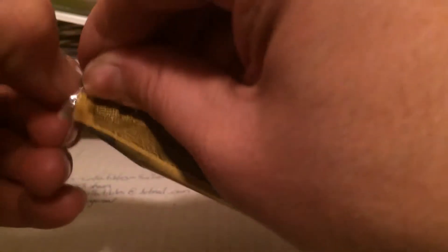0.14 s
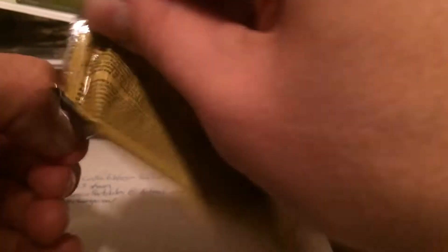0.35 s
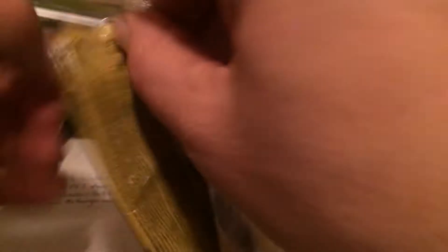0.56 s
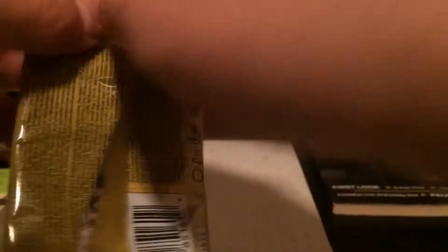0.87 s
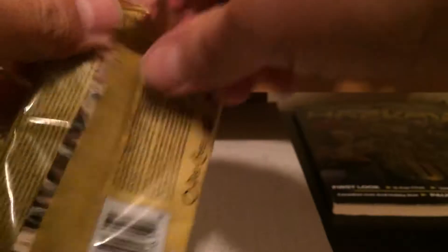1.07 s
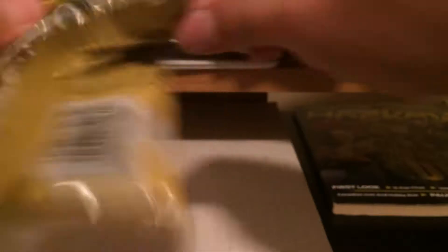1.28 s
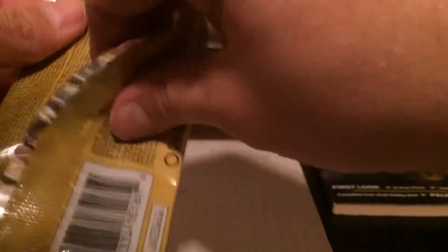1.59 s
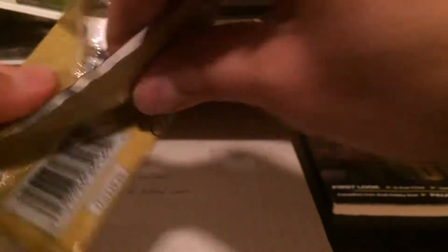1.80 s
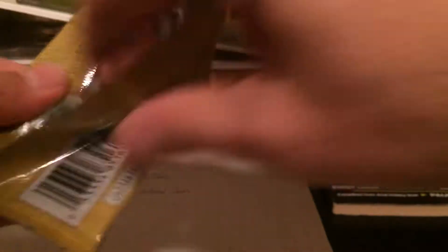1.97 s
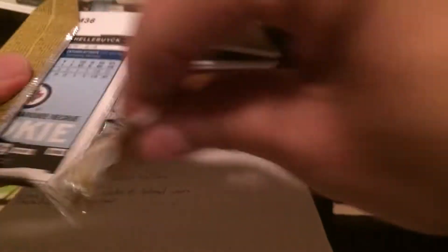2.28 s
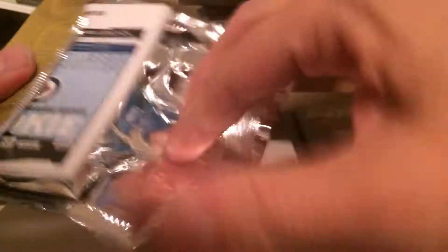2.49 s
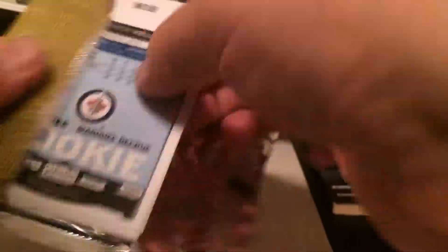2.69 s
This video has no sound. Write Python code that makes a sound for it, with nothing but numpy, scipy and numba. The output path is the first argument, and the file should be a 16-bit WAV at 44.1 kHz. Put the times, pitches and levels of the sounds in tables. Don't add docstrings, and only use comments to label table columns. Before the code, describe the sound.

Thin shiny foil packet picked at, crumpled and ripped open by hand, with bright snapping crackles

```python
import sys
import numpy as np
from scipy import signal
from scipy.fft import rfft, irfft
from scipy.io import wavfile
from numba import njit

SR = 44100
rng = np.random.default_rng(int(sys.argv[2]) if len(sys.argv) > 2 else 0)


def linear_from_db(decibels):
    return 10 ** (np.asarray(decibels, float) / 20)


def transcribe(u):
    v = np.clip(np.atleast_2d(u).T, -1, 1)
    q = np.round(v * 32767).astype(np.int16)
    wavfile.write(sys.argv[1], SR, q)


N = 125685

# (frequency [Hz], level [dB per Hz])
ROOM_COLOUR = [(18, -30), (30, -8), (75, -3), (131, -15), (780, -32.5), (4420, -47), (10200, -41),
               (16000, -41)]
# (time [s], level [dB], pitch [Hz], ring [s])
DESK_KNOCKS = [(0.519, -35, 220, 0.07), (0.59, -36.5, 206, 0.078), (0.646, -31, 195, 0.036),
               (0.683, -30.5, 199, 0.035), (0.71, -32.5, 129, 0.032), (0.753, -39.5, 58, 0.087),
               (1.147, -35, 143, 0.085), (1.384, -29.5, 72, 0.017), (2.043, -38, 123, 0.033),
               (2.52, -32, 199, 0.026), (2.541, -33.5, 101.4, 0.027), (2.618, -23, 247, 0.0069),
               (2.648, -39, 121, 0.036), (2.723, -24.5, 171, 0.005)]
POP_TIMES = [.3446, .3541, .409, 1.3157, 1.8634, 2.2578]
# (level [dB], leak time [s])
AIR_POPS = [
    (-14, 0.00099),
    (-6.5, 0.0048),
    (-11, 0.00069),
    (-9, 0.0014),
    (-2, 0.0018),
    (-5.5, 0.00027),
]
# (time [s], peak level [dB], pitch [Hz])
FACE_BUCKLES = [(.498, -31, 1150), (0.533, -31.5, 497), (0.591, -28, 670), (.62, -30, 560),
                (0.8, -30.5, 845), (.921, -21, 1570), (.952, -25, 1480), (1.059, -31, 1630),
                (1.37, -22, 620), (1.519, -28, 1230), (1.548, -26, 900), (1.826, -27, 445),
                (2.178, -31, 595), (2.376, -24.5, 380), (2.397, -23.5, 780), (2.442, -38, 315),
                (2.601, -23.5, 880), (2.837, -20.5, 750)]
# (time [s], foil level [dB], card stack level [dB])
FINGER_PRESSURE = [(0, -65, -71), (.18, -65.5, -65), (.24, -38, -41), (.33, -51, -50.5), (.44, -27.5, -39),
                   (.485, -41, -47.5), (.55, -34.5, -39), (.7, -37, -42), (1.0, -33, -47.5),
                   (1.2, -23.5, -62), (1.53, -26.5, -41), (1.6, -37, -48.5), (1.668, -30, -48),
                   (1.73, -38.5, -48), (2.11, -34, -51), (2.42, -35.5, -37.5), (2.648, -29.5, -36.5),
                   (2.72, -40.5, -45.5)]
# (frequency [Hz], level [dB per Hz])
FOIL_COLOUR = [(150, -52), (250, -50), (1380, -13.5), (1550, -18.5), (2760, -9), (3120, -2), (5930, -11.5),
               (11900, 11), (16000, -8.5)]
# (start [s], length [s], level [dB], brightness [dB per octave])
TEAR_JERKS = [(0.229, 0.0062, -21, -2.5), (0.358, 0.048, -8, -1), (0.746, 0.039, -24.5, -2),
              (0.81, 0.024, -25.5, 6), (0.833, 0.14, -25, -5.5), (0.976, 0.0046, -11.5, -5.5),
              (1.164, 0.034, -18.5, 1.5), (1.208, 0.068, -16, 2), (1.315, .005, -11.5, -2.5),
              (1.335, 0.049, -10, -3), (1.42, 0.048, -25.5, -4), (1.465, 0.085, -23, -2),
              (1.54, 0.0056, -16, -1), (1.634, 0.014, -13.5, -5), (1.748, 0.025, -24.5, -6.5),
              (1.792, 0.072, -19.5, 0), (1.869, 0.041, -10.5, -3), (1.916, 0.017, -23.5, -14),
              (2.044, 0.014, -17, -4), (2.153, 0.08, -26, -4), (2.234, .003, -11, -2.5),
              (2.252, 0.068, -8, -2), (2.321, 0.079, -20, -7.5), (2.506, 0.14, -27.5, -10.5),
              (2.826, .03, -24.5, -6.5)]
# (time [s], peak level [dB], patch pitch [Hz])
SINGLE_CREASES = [(0.0816, -19, 4440), (0.1282, -39, 11100), (0.1917, -40, 10500), (0.2019, -30, 8700),
                  (0.208, -29, 10400), (0.2205, -18.5, 12250), (0.2345, -21, 5460), (0.2477, -7.5, 9700),
                  (0.2605, -19, 6000), (0.2856, -18.5, 10700), (0.344, -7, 8650), (0.354, -10.5, 3520),
                  (0.3615, -13, 8100), (0.39, -11, 6500), (0.4088, -6, 5060), (0.42, -3.5, 6600),
                  (0.4299, -11, 9200), (0.463, -11, 9600), (0.4989, -28, 2310), (0.5186, -11.5, 8300),
                  (0.534, -17, 6100), (0.5453, -24, 5500), (0.5596, -16, 5400), (0.592, -15.5, 3400),
                  (0.621, -15, 5500), (0.6391, -6, 7200), (0.6633, -14, 7800), (0.6772, -9.5, 9100),
                  (0.7048, -17, 7800), (0.723, -13.5, 9250), (0.735, -12, 11800), (0.7422, -21, 4230),
                  (0.7468, -12, 6100), (0.7519, -11.5, 9350), (0.768, -20, 5100), (0.7798, -10, 8000),
                  (0.8103, -7.5, 7200), (0.8664, 1, 10800), (0.91, -16, 6670), (0.9212, -7.5, 6660),
                  (0.982, -8, 5230),
                  (1.0106, -8, 7100), (1.0303, -13, 7100), (1.0593, -14, 4350), (1.0919, -15, 10600),
                (1.1056, -15, 9000), (1.1148, -15, 7640), (1.1393, -10, 7300), (1.1521, -16, 6800),
                (1.1704, -13, 7400), (1.1822, 3.5, 5860), (1.1871, -8, 7500), (1.1968, -3, 6860),
                (1.2017, -2.5, 6600), (1.2124, 1.5, 7400), (1.2203, -7, 6500), (1.2428, -13, 6340),
                (1.2488, -7, 6750), (1.2724, -6.5, 5770), (1.3155, -6.5, 4600), (1.3212, -2, 7600),
                (1.3317, -1.5, 5160), (1.355, -2, 5360), (1.3627, -3.5, 5000), (1.3722, -4.5, 6100),
                (1.3916, -2, 7200), (1.3968, -8, 6500), (1.4196, -7.5, 8160), (1.4351, -3.5, 7350),
                (1.4444, -17, 7800), (1.4509, -10, 5700), (1.4894, -4, 6100), (1.5478, -6, 7300),
                (1.6266, -14, 7100), (1.6376, -2, 6000), (1.6562, -10, 6100), (1.6623, -24, 3400),
                (1.6732, -19, 6500), (1.6833, -16.5, 3970), (1.713, -17, 6170), (1.7524, -15, 5300),
                (1.7693, -14, 4970), (1.7978, -15, 5700), (1.8165, 0.5, 8100), (1.8238, -11, 5160),
                (1.8312, -4.5, 8300), (1.8407, -0.5, 7200), (1.8636, -4, 4000), (1.8751, -5, 7700),
                (1.9229, -5.5, 7160), (1.9321, -14, 4560), (1.9367, -17, 2880), (1.9447, -4, 7800),
                  (1.975, -13.5, 7200), (2.0137, -18, 9000), (2.0307, -10, 6200), (2.0521, -10, 5100),
                (2.0873, -23.5, 5400), (2.133, -19.5, 6400), (2.166, -9, 4750), (2.1767, -1.5, 5900),
                (2.1872, -14, 6600), (2.2372, 4.5, 7900), (2.2515, -9, 8300), (2.257, -11, 5240),
                (2.2975, -2, 6300), (2.314, -1, 4940), (2.3207, -5, 6800), (2.3369, 2, 6160),
                (2.3623, -4, 7200), (2.3672, -11, 8600), (2.3747, -17, 8600), (2.3982, -4, 9200),
                (2.412, -22, 6200), (2.4329, -15.5, 6500), (2.468, -16, 6860), (2.509, -17, 6600),
                (2.5257, -9, 5740), (2.5612, -9, 9700), (2.5756, -8.5, 9400), (2.5855, -20.5, 5900),
                (2.6024, -10, 6100), (2.6372, -12, 5400), (2.652, -17, 5400), (2.7187, -17, 9400),
                (2.839, -16, 3500)]


@njit
def rings(n, start, hz, cycles, size, sr):
    y = np.zeros(n)
    for k in range(len(start)):
        decay = np.pi * hz[k] / sr / cycles[k]
        turn = np.exp(2j * np.pi * hz[k] / sr - decay)
        z = size[k] * decay * np.e + 0j
        first = int(start[k])
        for j in range(min(int(8 / decay), n - first)):
            y[first + j] += j * z.real
            z *= turn
    return y


def colour_db(table, hz):
    points = np.array(table)
    return np.interp(np.log(hz), np.log(points[:, 0]), points[:, 1])


def snaps(at_s, db, hz, spread, lag_s, cycles, count):
    scatter = rng.standard_normal((len(at_s), count, 2))
    late = rng.laplace(0.6, 1, (len(at_s), count))
    late = late * (np.arange(count) > 0)
    detune = scatter[..., 0]
    detune = detune - detune.mean(axis=1, keepdims=True) / 1.3
    patch_hz = np.clip(hz[:, None] * np.exp(spread * detune), 150, 0.33 * SR)
    patch_cycles = cycles * np.exp(0.13 * np.clip(scatter[..., 1], -2, 1.5))
    size = linear_from_db(db[:, None] - 1.59 * np.abs(late))
    start = np.maximum(at_s[:, None] + late * lag_s, 0) * SR
    return rings(N, start.ravel(), patch_hz.ravel(), patch_cycles.ravel(), size.ravel(), 1.0 * SR)


def hail(db_of, slope_of, scatter_db, cycles, lag_s, count):
    u, luck = rng.random((count, 2)), rng.exponential(1, count)
    at_s = u[:, 0] * N / SR
    hz = 300 * 50 ** np.sqrt(u[:, 1])
    tilt_db = (slope_of(at_s) + 4) * np.log2(hz / 5000)
    db = db_of(at_s) + colour_db(FOIL_COLOUR, hz) + tilt_db + scatter_db * np.minimum(luck, 3.6)
    return snaps(at_s, db, hz, 0.4, lag_s, cycles, count=3)


def room():
    hz = np.maximum(np.arange(N // 2 + 1) * SR / N, 1)
    spectrum = rfft(rng.standard_normal(N)) * linear_from_db(colour_db(ROOM_COLOUR, hz)) * (hz > 40)
    air = irfft(spectrum, N)
    return air * linear_from_db(-59.5) / air.std()


def knocks():
    t, y = np.arange(N) / SR, 0
    width, rough = 1.5, 0.3
    for s, db, hz, ring_s in DESK_KNOCKS:
        d = np.maximum(t - s, 0)
        band = signal.butter(1, [hz / width, hz * width], "band", fs=SR, output="sos")
        rub = signal.sosfilt(band, rng.standard_normal(N))
        push = 12 * d / ring_s * np.exp(-4.5 * d / ring_s)
        y = y + linear_from_db(db) * push * (np.sin(2 * np.pi * hz * d) + rough * rub / rub.std())
    return y


def pops():
    t, y = np.arange(N) / SR, 0
    for s, (db, leak_s) in zip(POP_TIMES, AIR_POPS):
        d = t - s
        leak = -np.exp(-np.abs(d) / leak_s)
        pile_up = 2.8 * np.exp(-np.abs(d) / 0.00015)
        y = y + linear_from_db(db) * np.where(d > 0, leak, pile_up)
    return signal.sosfilt(signal.butter(2, 45.0, "high", fs=SR, output="sos"), y)


def stack():
    time_s, _, card_db = np.array(FINGER_PRESSURE).T
    u = rng.random((900, 3))
    at_s, hz = u[:, 0] * N / SR, 180 * 5 ** u[:, 1]
    db = np.interp(at_s, time_s, card_db) - 3.0 - 12.8 * np.log10(u[:, 2] + 0.18)
    return snaps(at_s, db, hz, 0.2, lag_s=0.00189, cycles=0.76, count=2)


def buckles():
    s, db, hz = np.array(FACE_BUCKLES).T
    return snaps(s, db + 1.0, hz, 0.19, lag_s=0.00143, cycles=1.49, count=4)


def kneading():
    time_s, foil_db, _ = np.array(FINGER_PRESSURE).T
    scatter_db, crackle_db = 2.4, 1

    def press_db(at_s):
        return np.interp(at_s, time_s, foil_db)

    rustle = hail(press_db, lambda at_s: -4.0, scatter_db, cycles=1.4, lag_s=0.001, count=4000)
    crackle = hail(lambda at_s: press_db(at_s) + crackle_db, lambda at_s: 0, scatter_db,
                   cycles=2.6, lag_s=0.00097, count=350)
    return rustle + crackle


def zipping():
    start_s, step_s, fade_db = 0.8105, 0.0022, 0.6
    rib = np.arange(12)
    return snaps(start_s + step_s * rib, -11.0 - fade_db * rib, 7800.0 + 0 * rib, 0.16,
                 lag_s=0.0001, cycles=1.8, count=4)


def tearing():
    attack_s, release_s, scatter_db = 0.002, 0.008, 1.6
    t = np.arange(0, N / SR, 0.001)
    total, tilt_sum = 1e-6, 0
    for s, length_s, db, slope in TEAR_JERKS:
        attack = np.clip((t - s) / attack_s, 0, 1)
        release = np.exp(-np.maximum(t - s - length_s, 0) / release_s)
        jerk = linear_from_db(db) * attack * release
        total = total + jerk
        tilt_sum = tilt_sum + jerk * slope
    tilt = tilt_sum / total
    catch = linear_from_db(1.5 * np.repeat(rng.standard_normal(len(t)), 5)[:len(t)])

    def tear_db(at_s):
        return 20 * np.log10(np.interp(at_s, t, total * catch))

    def slope_of(at_s):
        return np.interp(at_s, t, tilt)

    bed = hail(lambda at_s: tear_db(at_s) - 8.0, slope_of, scatter_db, cycles=2.2, lag_s=0.0008, count=11000)
    needles = hail(lambda at_s: tear_db(at_s) + 0.5, slope_of, scatter_db,
                   cycles=2.13, lag_s=0.00006, count=700)
    return bed + needles


def creases():
    s, db, hz = np.array(SINGLE_CREASES).T
    ring = snaps(s, db - 4.5, 1.146 * hz, 0.41, lag_s=0.0004, cycles=2.31, count=10)
    crack = snaps(s, db, 1.25 * hz, 0.34, lag_s=0.00012, cycles=1.13, count=4)
    return ring + crack


def scene():
    foil = creases() + zipping() + tearing() + kneading()
    foil = signal.sosfilt(signal.butter(3, 1000.0, "high", fs=SR, output="sos"), foil)
    pack = foil + stack() + buckles()
    tail_t60_s, tail_db = 0.02, -11
    t = np.arange(SR // 4) / SR
    tail = rng.standard_normal(len(t)) * np.exp(-np.log(1000) * t / tail_t60_s) * (t > 0.001)
    wet = signal.fftconvolve(pack, tail / np.linalg.norm(tail))[:N]
    return (pack + linear_from_db(tail_db) * wet + pops() + knocks() + room())[None]


def roll_off(x):
    return signal.sosfilt(signal.butter(12, 16970, fs=SR, output="sos"), x)


def record(dry):
    x = np.tanh(1.086 * dry) / 1.258
    x = signal.sosfilt(signal.butter(2, 13500.0, fs=SR, output="sos"), x)
    x = signal.sosfilt(signal.ellip(8, 0.2, 60, 15600, fs=SR, output="sos"), x)
    return roll_off(x)


dry = scene()
out = record(dry)
transcribe(out)
```